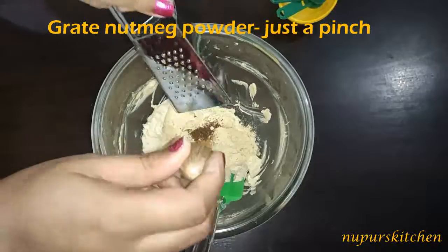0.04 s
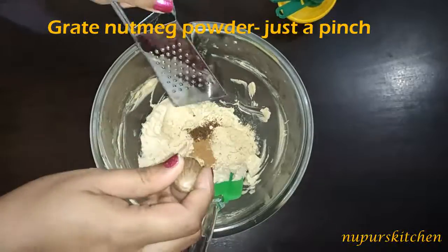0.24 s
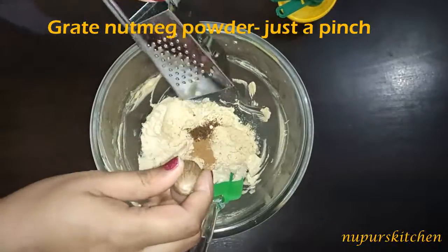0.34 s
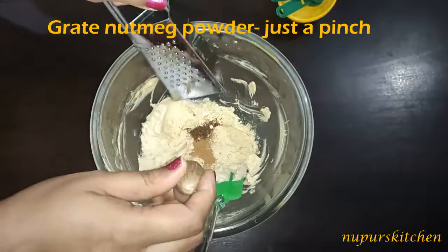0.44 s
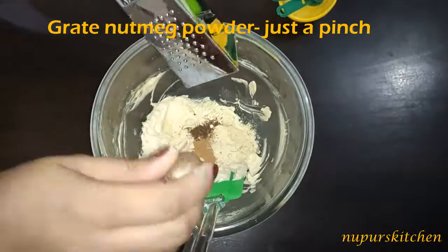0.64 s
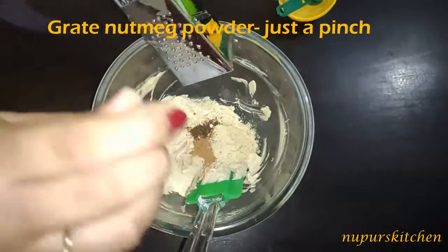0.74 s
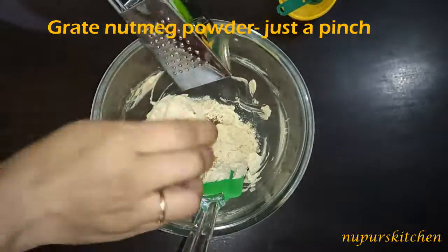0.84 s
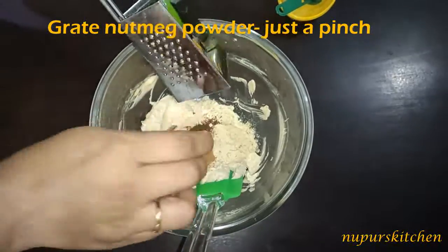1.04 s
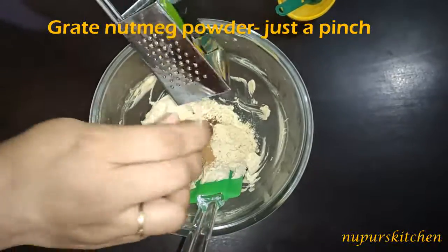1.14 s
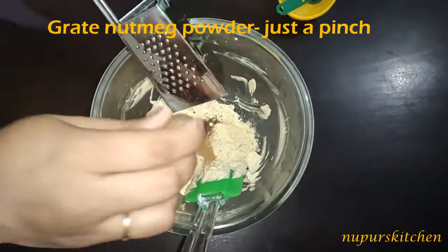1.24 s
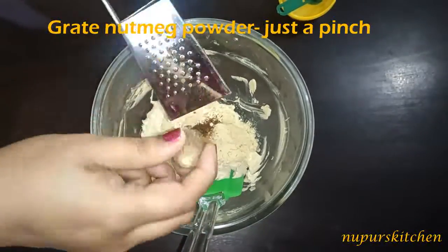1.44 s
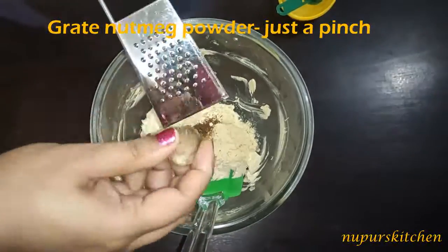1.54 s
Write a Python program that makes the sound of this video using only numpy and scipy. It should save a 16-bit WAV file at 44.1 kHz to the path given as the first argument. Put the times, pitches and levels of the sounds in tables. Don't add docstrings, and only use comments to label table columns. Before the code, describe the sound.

Two bright metal-on-glass strikes, the second softer, with dull table knocks in a humming kitchen

```python
import sys
import numpy as np
from scipy import signal
from scipy.fft import rfft, irfft, next_fast_len
from scipy.io import wavfile
from scipy.ndimage import map_coordinates

SR = 44100
rng = np.random.default_rng(int(sys.argv[2]) if len(sys.argv) > 2 else 0)


def wav_out(sig):
    wavfile.write(sys.argv[1], SR, np.round(np.clip(np.atleast_2d(sig).T, -1, 1) * 32767).astype(np.int16))


def level_to_linear(level):
    exponent = np.asarray(level, float) / 20
    return 10 ** exponent


N = 70560


def unit(x):
    return x / np.sqrt(np.mean(x ** 2) + 1e-20)


def along(points, hz):
    f, v = np.transpose(points)
    return np.interp(np.log(hz + 1), np.log(f + 1), v)


def wobble(rate_hz):
    knots = rng.standard_normal(int(N * rate_hz / SR) + 4)
    return map_coordinates(knots, [np.arange(N) * rate_hz / SR])


def filtered(x, response):
    m = next_fast_len(N + SR // 2)
    hz = np.fft.rfftfreq(m, 1 / SR)
    return irfft(rfft(x, m) * response(hz), m)[..., :N]


# f/Hz, correlation
LIKENESS = [(60, 0.94), (170, 1), (500, 0.79), (1460, -0.05), (4240, -0.0061), (12300, -0.13)]


def rush(spectrum):
    def mid_side(hz):
        angle = np.arccos(np.clip(along(LIKENESS, hz), -1, 1)) / 2
        return level_to_linear(along(spectrum, hz)) * [np.cos(angle), np.sin(angle)]

    mid, side = filtered(rng.standard_normal((2, N)), mid_side)
    return unit(np.array([mid + side, mid - side]))


def dying(start_s, t60_s, rise_s):
    t = np.maximum(np.arange(N) / SR - start_s, 0)
    return level_to_linear(-60 * t / t60_s) * (1 - np.exp(-t / rise_s))


def ring(start_s, hz, db, t60_s, rise_s, spread, scatter=np.pi):
    phase = scatter * rng.uniform(-1, 1)
    lag = spread * rng.standard_normal() * np.c_[[.5, -.5]]
    t = np.arange(N) / SR - start_s
    return level_to_linear(db) * dying(start_s, t60_s, rise_s) * np.sin(2 * np.pi * hz * t + phase + lag)


def lean(x, points):
    return filtered(x, lambda hz: level_to_linear(along(points, hz) * np.c_[[.5, -.5]]))


# f/Hz, level/dB
DIFFUSE_LEAN = [(60, 3), (150, 1.5), (350, 3), (860, 2), (2080, 9), (5060, 9.5), (12300, 5.5)]


def diffuse(x):
    return lean(x, DIFFUSE_LEAN)


# f/Hz, t60/s
ROOM_T60 = [(100, 1), (400, 0.81), (1500, 0.78), (5000, 0.71), (12000, 0.34)]
# f/Hz, level/dB
WALL_COLOUR = [(1100, -2.5), (1750, 1.5), (3300, -4.5), (3800, -6.5), (4600, -4.5), (7000, -0.5),
               (7950, -20.5), (8500, 2.5)]


def room(x, likeness):
    wall_delay_s = .008
    a, b = rng.standard_normal((2, SR))
    angle = np.arccos(np.clip(likeness, 0, 1)) / 2
    common, apart = np.cos(angle) * a, np.sin(angle) * b
    hz, t, z = signal.stft([common + apart, common - apart], SR, nperseg=256)
    decay_db = along(WALL_COLOUR, hz)[:, None] - 60 * t / along(ROOM_T60, hz)[:, None]
    tail = signal.istft(z * level_to_linear(decay_db), SR, nperseg=256)[1]
    late = np.pad(x.mean(0), (round(wall_delay_s * SR), 0))[None]
    return signal.fftconvolve(late, tail / np.linalg.norm(tail[0]), axes=1)[:, :N]


# f/Hz, density/dB per Hz
RUMBLE = [(12, -40.5), (20, -4.5), (53, 2), (75, -13), (157, -7.5), (344, -22), (375, -18.5), (600, -30.5),
          (780, -53.5), (1320, -120)]
# f/Hz, density/dB per Hz
AIR_HISS = [(400, -21.5), (570, -3.5), (800, -7.5), (3000, -9.5), (3600, -17.5), (5500, -19), (9500, -18.5),
            (12700, -23), (14000, -120)]
# f/Hz, rms level/dB, drift/Hz
WHINE_TONES = [(4017, -70.5, 4), (4430, -77.5, 4)]


def appliances():
    rumble_db, hiss_db = -50, -64.5
    t = np.arange(N) / SR
    whine = 0
    for hz, db, drift_hz in WHINE_TONES:
        level = level_to_linear(db - 2 + 1.5 * wobble(15))
        cycles = hz * t + np.cumsum(drift_hz * wobble(20)) / SR
        whine = whine + level * np.sin(2 * np.pi * cycles)
    rumble = level_to_linear(rumble_db + 0.31 * wobble(6.3)) * rush(RUMBLE)
    hiss = level_to_linear(hiss_db + .6 * wobble(6)) * rush(AIR_HISS)
    return diffuse(rumble + hiss + whine)


# t/s, level/dB
LAST_TICKS = [
    (.02, -63),
    (.31, -54),
    (.6, -59.5),
    (0.888, -54.5),
    (1.188, -58.5),
    (1.468, -58),
]
# f/Hz, level/dB
TICK_SPECTRUM = [(5500, -30), (6800, -9.5), (9500, -13.5), (10500, -25.5)]


def insect():
    gap_s, grows_db, tick_s = .019, 1, 0.0094
    ticks = 0
    for last_s, db in LAST_TICKS:
        for back in range(3):
            ticks = ticks + level_to_linear(db - grows_db * back) * dying(last_s - gap_s * back, 6 * tick_s, tick_s / 2)
    return diffuse(ticks * rush(TICK_SPECTRUM))


# t/s, peak level/dB, plate pitch factor
STRIKES = [
    (.2254, -8, 1.004),
    (.4205, -13, .988),
]
# f/Hz, first blow level/dB, second blow level/dB, t60/s
PLATE_MODES = [(370, -14.5, -20, 0.19), (537, -24.5, -26.5, 0.33), (709.2, -10.5, -12.5, 0.11),
               (803, -26.5, -13, .07), (1117.4, -6, -11.5, 0.095), (1725, -13, -9.5, 0.099),
               (1948, -17.5, -17, .07), (2643, -2.5, -3.5, 0.078), (3637, -17, -13, 0.11),
               (4130, -16.5, -7.5, .12), (6044, -12, -19, 0.08), (9010, -16.5, -17, 0.076),
               (10620, -21, -23, .06), (12500, -22, -20.5, .06)]


def plate_ring(start_s, blow, pitch):
    split, scatter_db = 0.0044, 3
    total = 0
    for mode in PLATE_MODES:
        for side in (-1, 1):
            hz = mode[0] * pitch * (1 + side * split)
            db = mode[1 + blow] + scatter_db * rng.standard_normal()
            total = total + ring(start_s, hz, db, mode[3], rise_s=.0015, spread=0.96)
    return total


# f/Hz, first blow level/dB, second blow level/dB, t60/s
GLASS_MODES = [(3088, -16.5, -9.5, .2), (3104, -9.5, -12, .22), (3146, -10, -12, 0.2),
               (3211, -10, -18, .22), (4780, -10.5, -12.5, .1), (4886, -13.5, -5, .15),
               (4830, -5.5, 1, .11), (4883, -18, -15, 0.37), (4904, -12, -15.5, .13),
               (6930, -21.5, -16.5, 0.26), (9330, -20.5, -24, 0.14), (9570, -24.5, -28.5, 0.31),
               (11440, -20.5, -27.5, .1), (6965, -26.5, -23.5, 0.18)]


def glass_ring(start_s, blow):
    return sum(ring(start_s, mode[0], mode[1 + blow], mode[3], rise_s=.0015, spread=1.3, scatter=.7)
               for mode in GLASS_MODES)


# f/Hz, density/dB per Hz
CONTACT_NOISE = [(90, -46), (250, -23), (520, -29), (1100, -18), (2800, -11), (4900, -17.5), (12500, -19),
                 (14000, -120)]


def clatter(start_s):
    crack_db, crack_t60_s = 4, 0.0075
    rattle_db, rattle_t60_s = -5, 0.093
    graze_db, graze_lead_s = -30, .0018
    rebound_db, rebound_delay_s = -7, .0162
    crack = dying(start_s, crack_t60_s, 0.00043)
    graze = level_to_linear(graze_db) * dying(start_s - graze_lead_s, .03, 0.00052)
    rebound = level_to_linear(rebound_db) * dying(start_s + rebound_delay_s, crack_t60_s, .0003)
    rattle = level_to_linear(rattle_db) * dying(start_s, rattle_t60_s, .0015)
    return rush(CONTACT_NOISE) * (level_to_linear(crack_db) * (crack + graze + rebound) + rattle)


# f/Hz, level/dB
DIRECT_LEAN = [(60, 0), (170, 0.0), (500, -1), (1460, 3), (4240, 7), (12300, -3.5)]


def blows():
    wet_db = -3.5
    plate_send_db = -9.5
    near, far = np.zeros((2, 2, N))
    for blow, (start_s, db, pitch) in enumerate(STRIKES):
        plate = plate_ring(start_s, blow, pitch)
        glass = glass_ring(start_s, blow)
        noise = clatter(start_s)
        near += level_to_linear(db) * (plate + glass + noise)
        far += level_to_linear(db + wet_db) * room(level_to_linear(plate_send_db) * plate + glass + noise, likeness=0.15)
    return lean(near, DIRECT_LEAN) + diffuse(far)


# t/s, level/dB, pitch factor
FOOT_KNOCKS = [(0.2266, -15, 0.78), (0.267, -23, 0.6), (0.281, -18.5, 0.79), (0.2916, -8.5, 0.97),
               (0.315, -21.5, 1.3), (.331, -17.5, 1.1), (.347, -14, 1.02), (.370, -24, .98),
               (.392, -17, .95), (0.429, -19.5, .72), (.46, -25, .98), (0.486, -25, 1.11),
               (0.521, -27, 0.73)]
# f/Hz, level/dB, t60/s
TABLE_MODES = [(132, -12.5, 0.07), (205, -8.5, .05), (284.1, 1, 0.042), (361.7, -12, 0.089),
               (463, -13.5, 0.054), (729.3, -14.5, 0.068), (927.4, -21, 0.026)]


def rocking():
    wet_db = -10
    knocks = 0
    for start_s, db, pitch in FOOT_KNOCKS:
        for mode_hz, mode_db, t60_s in TABLE_MODES:
            hz = mode_hz * pitch * (1 + 0.025 * rng.standard_normal())
            level_db = db + mode_db + 0.59 * rng.standard_normal()
            knocks = knocks + ring(start_s, hz, level_db, t60_s, rise_s=.0025, spread=0.24, scatter=0.56)
    return knocks + level_to_linear(wet_db) * room(knocks, likeness=.95)


def scene():
    return blows() + rocking() + appliances() + insect()


def low_pass(x):
    return signal.sosfilt(signal.butter(12, 12500, fs=SR, output="sos"), x)


def record(dry):
    top_hz, slope_hz = 12600, 500

    def band(hz):
        slope = np.clip((hz - top_hz + slope_hz) / slope_hz, 0, 1)
        return level_to_linear(-9 * slope) * (hz < top_hz)

    mix = filtered(np.clip(dry, -.9, .9), band)
    return low_pass(mix)


dry = scene()
out = record(dry)
wav_out(out)
```